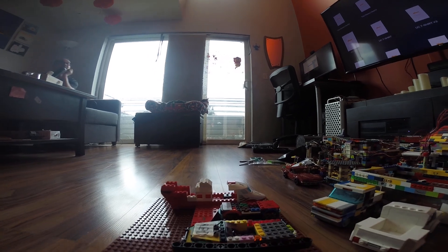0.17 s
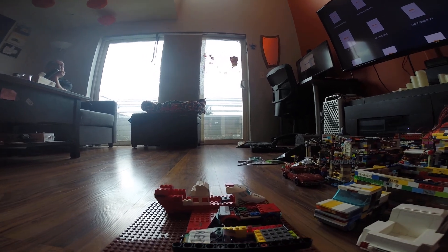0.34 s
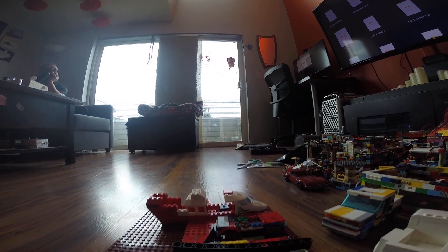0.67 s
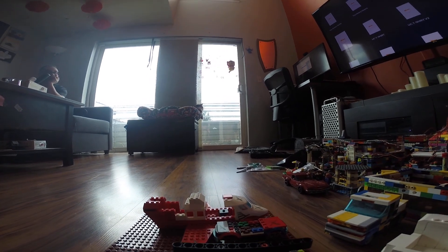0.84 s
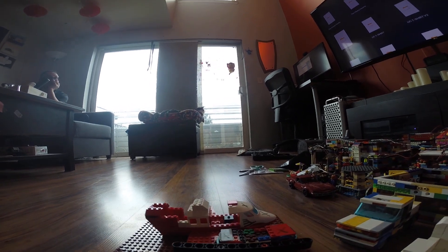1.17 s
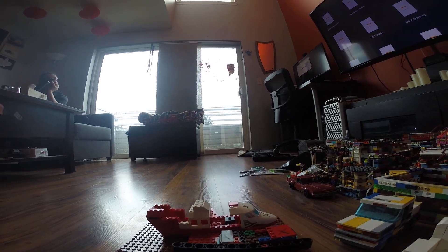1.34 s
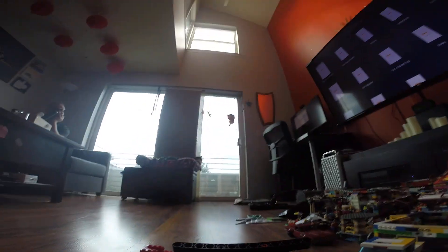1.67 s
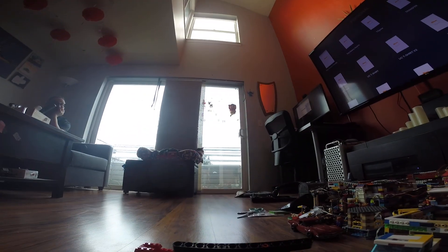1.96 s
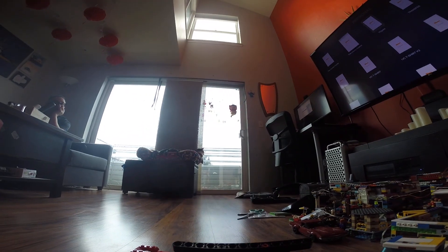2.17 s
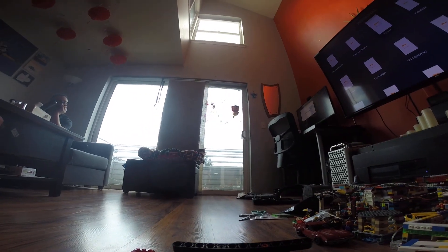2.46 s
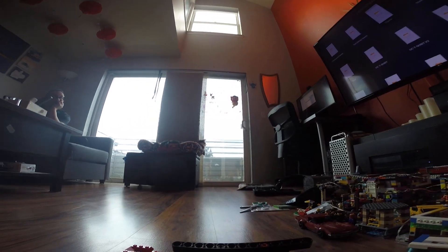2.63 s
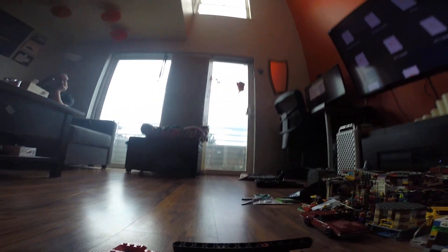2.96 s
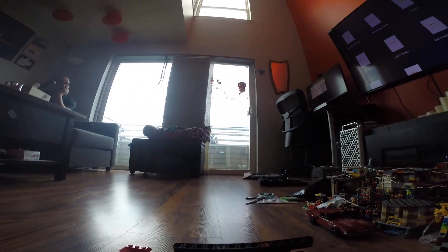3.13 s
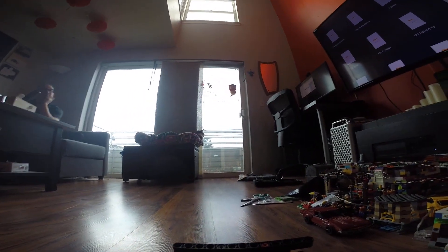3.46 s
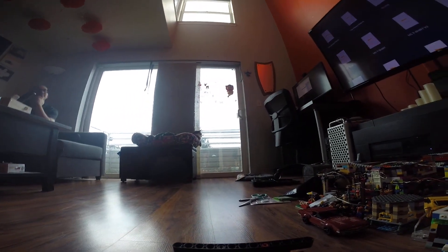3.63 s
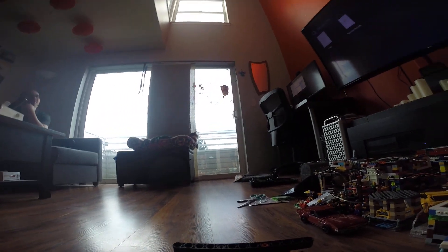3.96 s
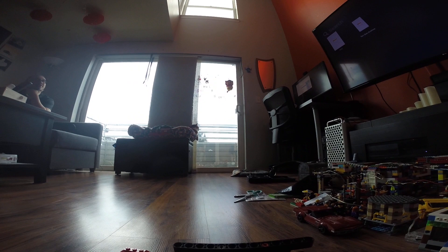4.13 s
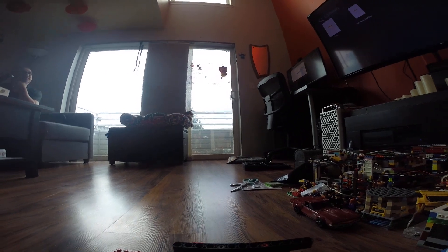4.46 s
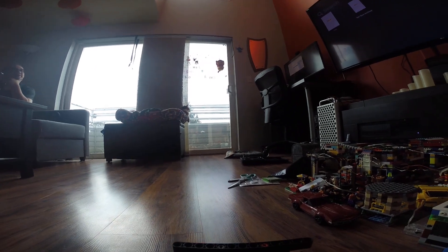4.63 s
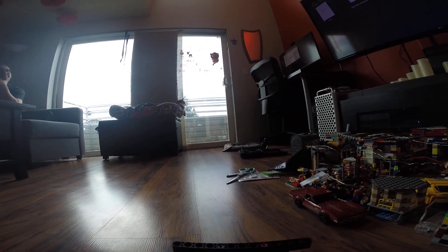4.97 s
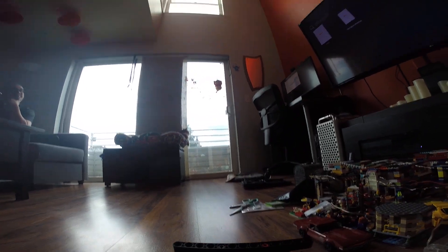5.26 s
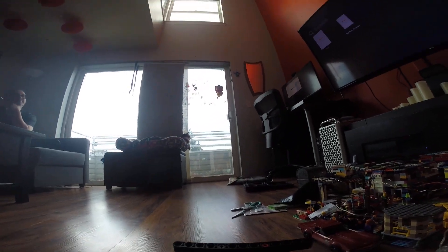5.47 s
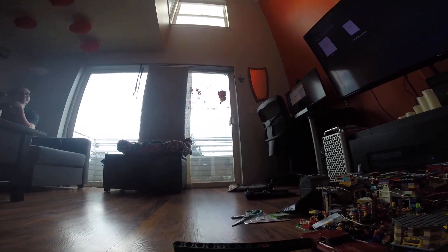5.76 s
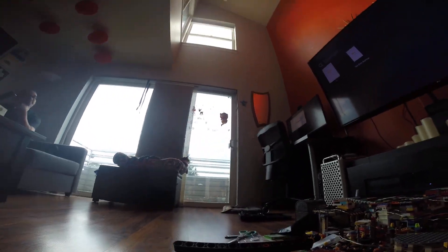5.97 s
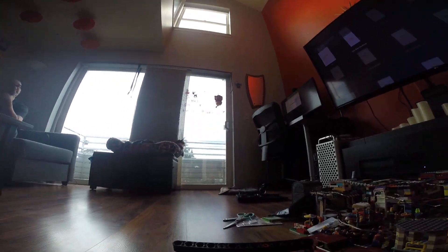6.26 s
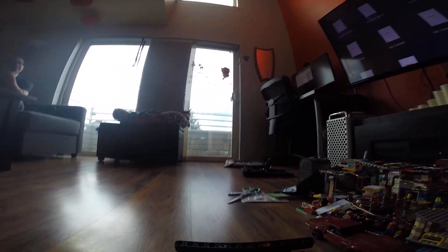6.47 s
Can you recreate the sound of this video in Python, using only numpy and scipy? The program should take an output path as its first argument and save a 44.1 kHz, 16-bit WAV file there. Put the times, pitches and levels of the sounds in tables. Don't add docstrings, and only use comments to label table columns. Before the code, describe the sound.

Very close to a small boxed microphone riding on it, a toy truck of plastic bricks moves in jerks over an indoor wooden floor. Loose bricks chatter first over low rumble, then scrapes and wheel thumps follow in bursts, with quiet gaps of faint hiss. Hard plastic cracks land around three seconds, just before four, at five and a half and at six, after which the hiss dips briefly.

```python
import sys
import numpy as np
from scipy import signal
from scipy.fft import rfft, irfft
from scipy.io import wavfile
from scipy.ndimage import uniform_filter1d

SR = 44100
rng = np.random.default_rng(int(sys.argv[2]) if len(sys.argv) > 2 else 0)


def linear_from_db(decibels):
    return 10 ** (np.asarray(decibels, float) / 20)


def wav_record(signal):
    frames = np.transpose(np.atleast_2d(signal))
    bounded = np.clip(frames, -1, 1)
    quanta = np.round(bounded * 32767).astype(np.int16)
    wavfile.write(sys.argv[1], SR, quanta)


N = 291060
T = np.arange(N) / SR

# (pitch [Hz], level [dB], t60 [s])
HOLLOW = [(294, 2.5, 0.012), (452, 1.5, 0.024), (571, 7.5, 0.0085), (824, 1, 0.017)]
SHELL = [(860, 5.4, 0.013), (1136, 9.16, 0.017), (1393, 9.23, 0.011), (1581, 7.4, 0.014)]
BRICK = [(1950, -5, .018), (2075, -1, .022), (2280, -3, .016), (2440, -1, .022), (2570, -3, .018),
         (2700, -7, .016), (2820, -12, .014)]
EDGE = [(3255, 1.5, 0.014), (3510, -13, 0.031), (3783, -12.5, 0.028), (4293, -11.5, 0.025),
        (4510, -8, 0.0078), (5070, -12, 0.015), (6140, -7.5, 0.0023), (6900, -33.5, 0.0022)]
PARTS = (HOLLOW, SHELL, BRICK, EDGE)
# (time [s], held [s], rumble [dB], scrape [dB], loose bricks on top against scrape [dB])
SHOVES = [(.02, .4, -57, -42.5, -4), (.57, 0.08, -60, -44.5, -5), (0.769, 0.067, -30.5, -37.5, -8.5),
          (1.14, 0.034, -41.5, -57, -4), (1.229, 0.092, -28.5, -41.5, -7), (1.548, 0.12, -24.5, -31.5, -7),
          (1.72, 0.11, -65, -48, 1), (1.901, 0.038, -26.5, -33, -9), (2.601, 0.11, -34, -50, -17),
          (2.699, 0.033, -28, -36, -30), (3.028, .12, -23.5, -29.5, -10), (3.48, 0.36, -42, -70, -16),
          (4.08, 0.093, -38.5, -67, -12), (4.2, 0.094, -50.5, -53, -1.5), (4.55, .03, -43, -54, -22),
          (4.969, 0.13, -29.5, -40, -9.5), (5.261, .06, -55, -45.5, -6.5), (5.33, 0.062, -40, -36, -8.5),
          (5.408, 0.0099, -34, -46, -7), (5.5, 0.041, -31.5, -32, -9), (5.62, 0.23, -44.5, -46, -9),
          (5.969, 0.036, -30, -26.5, -13), (6.079, 0.13, -43.5, -65, -31), (6.48, .15, -44, -51, -4.5)]


def unit(x):
    return x / np.sqrt(np.mean(x ** 2))


def walk(rate):
    k = int(SR / rate)
    steps = np.repeat(rng.standard_normal(N // k + 1), k)
    return 1.77 * uniform_filter1d(uniform_filter1d(steps, k), k)[:N]


def ring(modes, length_s, detune=1., luck_db=0.):
    hz, db, t60 = np.transpose(modes)[:, :, None]
    t = T[:int(length_s * SR)]
    sense = (-1) ** np.arange(len(modes))[:, None]
    decay = 1000. ** (-t / t60)
    return np.sum(sense * linear_from_db(db + luck_db) * np.sin(2 * np.pi * hz * detune * t) * decay, axis=0)


def add(out, s, x):
    i = max(int(s * SR), 0)
    out[i:i + len(x)] += x[:N - i]


def preamp():
    # (frequency [Hz], density [dB per Hz])
    hiss_curve = [(180, -21.5), (300, -4.5), (1090, -6), (1490, -9), (2400, -8.5), (3280, -14.5),
                  (13200, -33.5), (15100, -29)]
    # (time [s], length [s], level over hiss [dB])
    fizz_bursts = [(0.083, .035, 7), (.18, .025, 7), (.23, .035, 5), (.34, 0.03, 7), (.47, .03, 6),
                   (.58, 0.032, 7.5), (1.082, .02, 4), (1.14, 0.075, 4), (1.5, 0.071, 2), (1.79, .03, 4),
                   (2.525, .06, 5), (2.81, 0.061, 3), (3.196, 0.042, 3), (3.575, .05, 3), (4.08, .02, 6),
                   (4.145, 0.032, 5), (4.57, 0.031, 7), (4.82, 0.023, 5), (5.028, .03, 13), (5.17, .04, 3),
                   (5.69, .13, 2), (5.837, 0.16, 7.5), (6.053, .1, 8), (6.358, 0.018, 4), (6.515, .03, 7.5)]
    # (pitch [Hz], level [dB], t60 [s])
    fizz_bands = [(7000, -4, 0.006), (9200, 3, 0.0043), (13700, -6, 0.0027)]
    hiss_db = -77
    whine_hz, whine_db = 13475, -11
    blink_hz, blink_db, blink_rate, blink_phase = 5659.5, 3.5, 24, 1.9
    duck_s, duck_depth_db, recovery_db_s = 6.0, -13, 20

    hz, db = np.transpose(hiss_curve)
    bins = np.maximum(np.fft.rfftfreq(N, 1 / SR), 1)
    colour = linear_from_db(np.interp(np.log(bins), np.log(hz), db))
    treble = (bins > 8000) & (bins < 13000)
    colour /= np.sqrt(np.sum(colour[treble] ** 2) / len(bins))
    hiss = irfft(rfft(rng.standard_normal(N)) * colour, N) * linear_from_db(1.0 * walk(24))

    writes = sum(linear_from_db(d) * ((T > s) & (T < s + length)) for s, length, d in fizz_bursts)
    fizz_noise = unit(np.convolve(rng.standard_normal(N), ring(fizz_bands, .01))[:N])
    fizz = uniform_filter1d(writes, size=200) * fizz_noise

    whine = linear_from_db(whine_db + 2.0 * walk(25)) * np.sin(2 * np.pi * whine_hz * T + .3 * walk(34))
    lit = np.clip(.5 + 2 * np.cos(2 * np.pi * (blink_rate * T - blink_phase)), 0, 1)
    blink = linear_from_db(blink_db) * lit * np.sin(2 * np.pi * blink_hz * T + .25 * walk(60))

    duck_db = (T > duck_s) * np.minimum(duck_depth_db + recovery_db_s * (T - duck_s), 0)
    return linear_from_db(hiss_db + duck_db) * (hiss + fizz + whine + blink)


def axle():
    # (time [s], level [dB])
    axle_blows = [
        (3.835, 0),
        (5.495, 0),
        (6.013, -4),
    ]
    pin = (1816, -42, .36)  # Hz, dB, t60 s
    out = np.zeros(N)
    for s, db in axle_blows:
        add(out, s, linear_from_db(db) * ring([pin], .4))
    add(out, 6.0121, linear_from_db(-3.5) * np.hanning(12))

    start_s, end_s, stick_slip_hz = 5.562, 5.65, 4334
    gate = np.clip(np.minimum(T - start_s, end_s - T) / .003, 0, 1)
    phase = 2 * np.pi * np.cumsum(stick_slip_hz * (1 + 0.0033 * walk(15))) / SR
    squeak = linear_from_db(-68) * np.sin(2 * phase) + linear_from_db(-79) * np.sin(3 * phase)
    side = linear_from_db(-82) * np.sin(2.36 * phase)
    return out + np.sqrt(2) * gate * (squeak + side)


def effort(coast_db, shove_db, fall_db_s):
    rise_db_s = 501
    start, held = np.transpose(SHOVES)[:2, :, None]
    t = T[::100]
    ramp = np.minimum(0, np.minimum((t - start) * rise_db_s, (start + held - t) * fall_db_s))
    shoves = np.interp(T, t, np.sum(linear_from_db(2 * (shove_db[:, None] + ramp)), axis=0))
    return 10 * np.log10(shoves + linear_from_db(2 * coast_db))


def rumble(sway_db, chassis_db):
    # (pitch [Hz], level [dB], t60 [s])
    sway = [(24.1, 17.5, 0.37), (38.2, 12, 0.32), (48.1, 14.5, 0.57)]
    chassis = [(58, -5, .12), (75, -1, .14), (100, -4, .1), (135, -2, .11), (170, -8, .07), (205, -5, .05),
               (260, -17, .04)]
    out = 0
    for modes, db in ((sway, sway_db), (chassis, chassis_db)):
        grain = rng.standard_normal(N) * linear_from_db(3.0 * walk(22))
        out = out + linear_from_db(db) * unit(signal.fftconvolve(grain, ring(modes, .3))[:N])
    return out


def thumps():
    # (time [s], peak [dB], pitch [Hz], t60 [s])
    wheel_drops = [(0.595, -13.5, 163, 0.037), (0.768, -26, 129, 0.19), (1.225, -17, 82, 0.098),
                   (1.312, -29, 63, 0.19), (1.539, -23, 67, 0.12), (1.894, -11, 118, 0.044),
                   (1.927, -15, 73, 0.14), (2.603, -26.5, 107, 0.13), (2.677, -25, 134, 0.11),
                   (3.027, -13, 82, 0.14), (3.085, -8.5, 76, 0.14), (3.139, -15.5, 123, 0.37),
                   (3.825, -30.5, 124, 0.21), (4.125, -19.5, 149, 0.059), (4.966, -22, 76, 0.08),
                   (5.023, -18, 65, 0.11), (5.407, -12.5, 122, 0.11), (5.489, -16, 133, 0.17),
                   (5.598, -20.5, 68, 0.035), (6.008, -12.5, 105.5, 0.13), (6.012, -13, 200, 0.05),
                   (6.063, -17.5, 61.8, 0.055)]
    # (time [s], peak [dB], pitch [Hz], t60 [s])
    taps = [
        (1.831, -17, 610, 0.015),
        (5.647, -25, 487, 0.01),
        (5.7, -16.5, 480, 0.02),
        (5.764, -17, 477, 0.016),
        (5.812, -18.5, 490, 0.019),
        (5.83, -25, 430, 0.016),
        (6.354, -21, 1390, 0.015),
    ]
    out = np.zeros(N)
    for table, push_cycles, upper_db in ((wheel_drops, .7, -9), (taps, .4, -4)):
        for s, db, hz, t60 in table:
            modes = [(hz, 0, t60), (1.5 * hz, upper_db, .6 * t60), (2.3 * hz, upper_db - 3, .6 * t60)]
            x = np.convolve(ring(modes, .25), np.hanning(int(push_cycles * SR / hz)))
            add(out, s, x / np.abs(x).max() * linear_from_db(db - 1.5))
    return out


def scrape(dull_db, bright_db):
    part_share = [
        -9,
        -10.5,
        -5.5,
        -14.5,
    ]
    ticks_per_s = 1500
    out, bursts = 0, linear_from_db(1.54 * walk(40))
    for modes, db, share_db in zip(PARTS, (dull_db, dull_db, bright_db, bright_db), part_share):
        sizes = linear_from_db(3.8 * np.minimum(rng.exponential(size=N), 3))
        ticks = (rng.random(N) < ticks_per_s / SR) * rng.standard_normal(N) * sizes
        rub = (unit(ticks) + 0.34 * rng.standard_normal(N)) * bursts
        out = out + linear_from_db(db + share_db) * unit(signal.fftconvolve(rub, ring(modes, .06))[:N])
    return out


def knocks():
    # (time [s], peak [dB], hardness [dB], chatter [s])
    under = [(0.054, -30, 2, 0.018), (.195, -37, -8, 0.013), (.466, -41, 6, .006),
             (1.426, -40.5, -14, .006), (1.464, -37.5, -19, 0.013), (1.568, -30, 9, 0.0099),
             (2.373, -35.5, -18, 0.0046), (2.631, -31, -4, 0.01), (2.68, -31.5, 3, 0.0088),
             (2.784, -36.5, 5, .008), (2.818, -41, 3, .006), (3.002, -12, -10, 0.0045),
             (3.305, -41, -7, 0.0038), (3.518, -45, 2, 0.0039), (3.612, -35, -6, 0.002),
             (3.817, -36.5, 0, 0.0082), (4.079, -42, -7, 0.0044), (4.442, -47, -12, 0.0062),
             (5.025, -25, 1, 0.019), (5.195, -50.5, -2, 0.0061), (5.462, -37.5, 2, 0.0035),
             (5.49, -19.5, 11, 0.015), (5.596, -38, 3, 0.0085), (5.647, -21.5, 0, 0.0057),
             (5.927, -34, 5, 0.027), (5.957, -26, 0, 0.0096), (5.984, -22, 3, 0.0066),
             (6.01, -8.5, 5, 0.0054)]
    side_on = [(1.523, -21, -9, 0.003), (1.597, -28, -6, 0.02), (1.636, -27, 5, 0.0064),
               (1.658, -22.5, 6, 0.015), (1.683, -22, 3, 0.0064), (1.782, -37, -9, 0.013),
               (1.921, -15, 1, 0.0057), (2.499, -37.5, 0, 0.011), (2.858, -37, 1, 0.0062),
               (3.0075, -2.5, 1, 0.006), (3.084, -31, -3, .007), (3.1213, -6, -0.5, .005),
               (3.228, -34.5, 5.5, 0.0094), (3.626, -30, 0, 0.004), (3.834, -1, -5.5, 0.005),
               (4.288, -39.5, 6, .009), (4.547, -31, -6, .007), (4.571, -32, -0.5, 0.024),
               (4.648, -40, -9, 0.0067), (4.9, -22.5, -4, 0.0091), (5.007, -34, -9, 0.0037),
               (5.339, -26, 1.5, 0.011), (5.494, -3.5, 3, 0.0029), (6.353, -36, 1, 0.0051),
               (6.437, -32, -3, 0.0057), (6.565, -35.5, 3, 0.051)]
    on_top = [(0.655, -43.5, 3, .013), (1.315, -28.5, -1, 0.0071), (2.695, -11, -6.5, 0.0027),
              (3.021, -12.5, -0.5, 0.01), (3.188, -22, -9.5, 0.0063), (4.915, -24, -1, 0.012),
              (4.932, -20.5, 5.5, 0.005), (4.97, -14.5, 3.5, .0034), (5.045, -20.5, -4.5, 0.0083),
              (5.08, -31, 1, 0.0068), (5.132, -32.5, -2, 0.0054), (5.498, -8, -2, 0.0032),
              (5.544, -22, 0.5, 0.0068), (6.019, -8, -6, 0.0086)]
    rattles = [(0.0, -41, 18, .012), (.14, -25, 10, 0.031), (0.32, -25.5, 2.5, 0.059),
               (.54, -25.5, 6, 0.043), (0.757, -27.5, -13, 0.042), (.823, -27, 13, 0.039),
               (1.215, -31.5, -7, 0.017), (1.228, -19.5, -2.5, 0.032), (1.243, -29, 16, 0.031),
               (1.364, -34, -3, 0.02), (1.887, -7.5, -3.5, .038), (1.942, -20.5, 1.5, .026),
               (2.217, -29.5, 5, .026), (2.559, -33, 8, 0.027), (2.717, -27, -5, 0.032),
               (3.049, -22.5, -4, 0.04), (3.099, -14, -3, 0.062), (3.141, -21.5, -12, 0.066),
               (3.719, -26, -4, 0.023), (4.15, -48.5, 15.5, 0.0099), (4.386, -28.5, 1, 0.028),
               (5.373, -28, 4, 0.046), (5.509, -28, -6, .03), (5.657, -30, 8.5, 0.022),
               (6.036, -18.5, -2.5, 0.031)]
    # (hollow [dB], shell [dB], brick [dB], edge [dB])
    colours = [
        (1.5, -4, -9.5, -24),
        (-7.5, -4, -14, -17.5),
        (-9.5, -6, -7.5, -9.5),
        (-7, -4, -6, -14.5),
    ]
    hollow_lag = [
        .01,
        0.27,
        0.17,
        0.02,
    ]
    # (mean gap [s], first touch against the rest [dB])
    bounce = [
        (.0012, -3),
        (.0012, 2),
        (.0012, 0),
        (.003, 6),
    ]
    mean_blow_db = -25
    crack_db, crack_decay_s = -11, .0004

    out = np.zeros(N)
    kinds = zip((under, side_on, on_top, rattles), colours, hollow_lag, bounce)
    for table, colour, lag, (gap_s, first_db) in kinds:
        chance = rng.standard_normal((len(table), 192))
        for (s, db, hard_db, chatter_s), c in zip(table, chance):
            when = np.cumsum(gap_s * np.exp(.6 * c[:64]))
            when -= when[0]
            fade = np.exp(-when / .07 - (when / max(chatter_s, .001)) ** 3)
            parts_db = db + np.array(colour) + hard_db * np.array([0, 0, 1, 1])
            parts_db[0] -= lag * (db - mean_blow_db)
            for k, (modes, part_db) in enumerate(zip(PARTS, parts_db)):
                size = np.sign(np.roll(c[64:128], k)) * linear_from_db(3.5 * np.roll(c[128:], 5 * k)) * fade
                size[0] = linear_from_db(first_db)
                touches = np.bincount((when * SR).astype(int), size)
                blows = np.convolve(touches, np.hanning(7))
                luck = c[70 + 8 * k:70 + 8 * k + len(modes), None]
                part = signal.fftconvolve(blows, ring(modes, .05, 1 + .015 * luck, 2.5 * luck[::-1]))
                add(out, s - .001, part / np.abs(part).max() * linear_from_db(part_db))
            snap = np.convolve(blows, np.diff(c[64:]) * np.exp(-T[:127] / crack_decay_s))
            add(out, s - .001, snap / np.abs(snap).max() * linear_from_db(parts_db[3] + crack_db))
    return out


def scene():
    # (time [s], level [dB])
    coast = [(0, -30.5), (.37, -34.5), (1.06, -50), (1.42, -48), (2.06, -42.5), (2.3, -37.5), (2.55, -47),
             (2.95, -52), (3.16, -42), (3.4, -45.5), (3.7, -41), (3.98, -48.5), (4.35, -40), (4.68, -48),
             (4.88, -43.5), (5.75, -48.5), (6.3, -51.5), (6.6, -50)]
    coast_scrape_db, coast_bright_db = -13, -14
    sway_over_rumble_db = -1.5
    sway_fall_db_s, chassis_fall_db_s, scrape_fall_db_s = 118, 168.5, 225
    housing_hz = 6170

    coast_db = np.interp(T, *np.transpose(coast))
    rumble_db, scrape_db, loose_db = np.transpose(SHOVES)[2:]
    sway_db = effort(coast_db, rumble_db, sway_fall_db_s) + sway_over_rumble_db
    chassis_db = effort(coast_db, rumble_db, chassis_fall_db_s)
    dull_coast_db = coast_db + coast_scrape_db
    dull_db = effort(dull_coast_db, scrape_db, scrape_fall_db_s)
    bright_db = effort(dull_coast_db + coast_bright_db, scrape_db + loose_db, scrape_fall_db_s)

    background = preamp() + axle()
    wheels = rumble(sway_db, chassis_db) + thumps()
    bricks = scrape(dull_db, bright_db) + knocks()
    bricks = signal.sosfilt(signal.butter(3, housing_hz, fs=SR, output="sos"), bricks)
    return (background + wheels + bricks)[None]


def top_cut(x):
    return signal.sosfilt(signal.butter(12, 15220, fs=SR, output="sos"), x)


def record(dry):
    top_hz = 14750
    dry = signal.sosfilt(signal.ellip(8, .2, 50, top_hz, fs=SR, output="sos"), dry)
    return top_cut(np.clip(dry, -1, 1))


dry = scene()
out = record(dry)
wav_record(out)
```